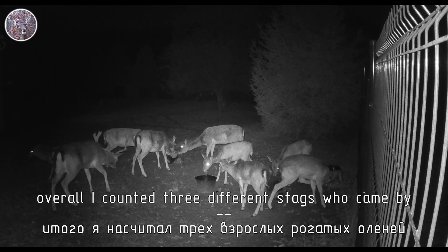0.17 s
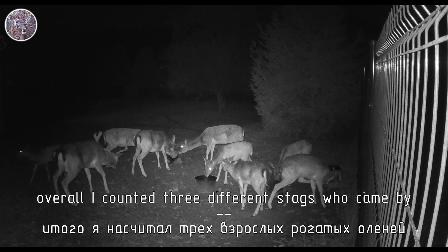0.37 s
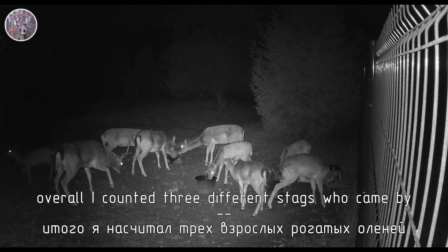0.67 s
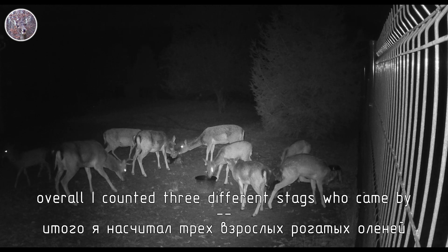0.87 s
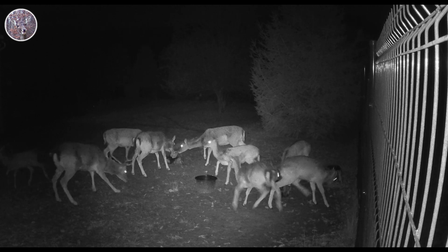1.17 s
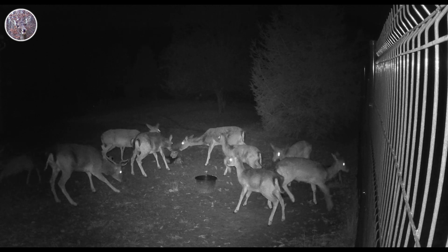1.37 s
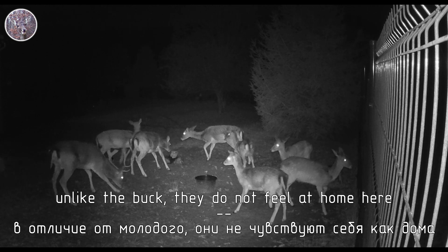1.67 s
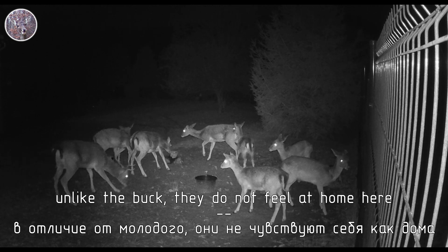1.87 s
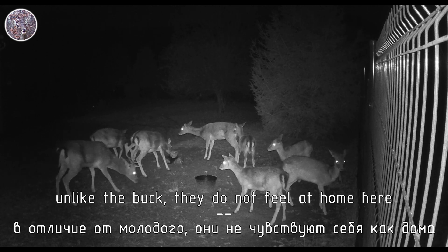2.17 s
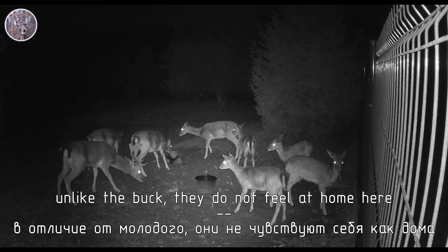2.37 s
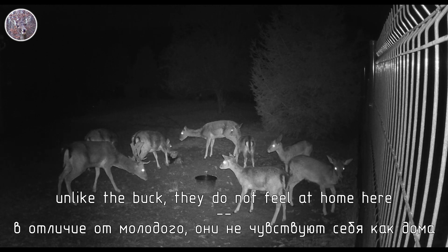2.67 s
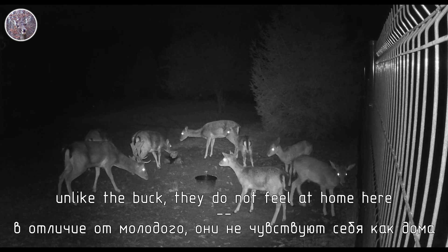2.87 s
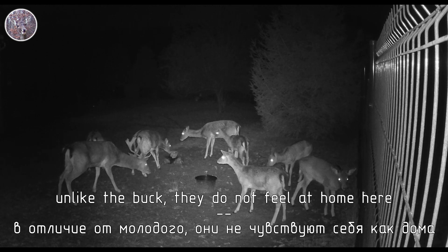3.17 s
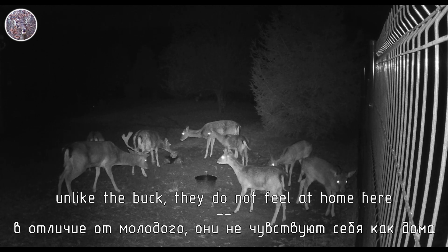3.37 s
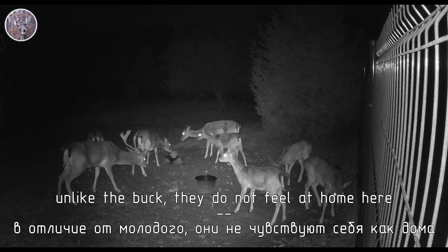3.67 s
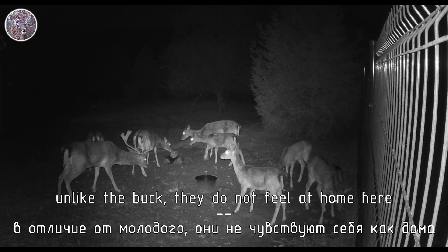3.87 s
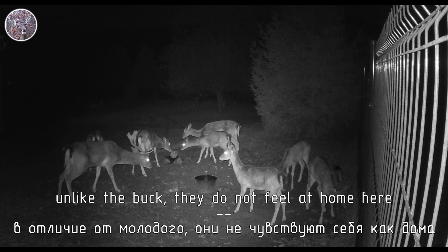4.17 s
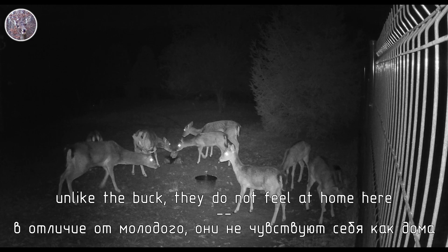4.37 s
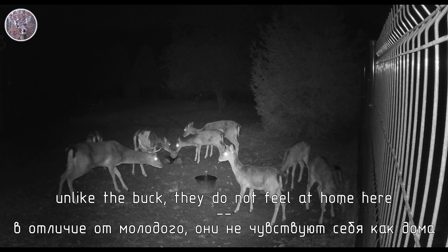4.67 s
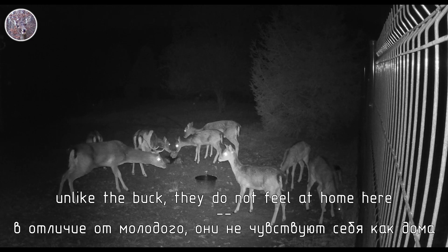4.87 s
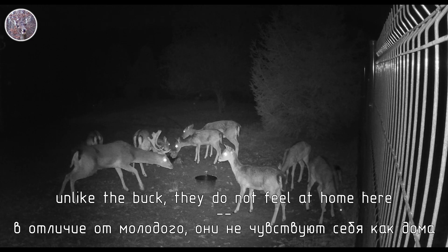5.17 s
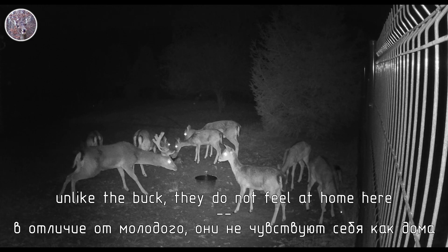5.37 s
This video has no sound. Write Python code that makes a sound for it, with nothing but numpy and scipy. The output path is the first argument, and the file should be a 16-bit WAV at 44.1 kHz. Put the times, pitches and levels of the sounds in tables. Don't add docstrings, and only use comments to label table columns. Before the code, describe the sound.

Five guttural deer grunts come roughly a second apart, each under half a second, starting tight and nasal, then sinking and fading. Trees, ground and a fence return a diffuse tail. Behind them are a distant stag's two weak calls, tiny piercing bird squeaks, mostly after the third grunt, and a barely audible twig snap at the end. Quiet night hush runs throughout, heard from a fixed outdoor microphone at moderate distance.

```python
import sys
import numpy as np
from scipy import signal
from scipy.io import wavfile
from scipy.ndimage import uniform_filter1d

SR = 44100
rng = np.random.default_rng(int(sys.argv[2]) if len(sys.argv) > 2 else 0)


def put_to_file(sound):
    columns = np.atleast_2d(sound).T
    safe = np.clip(columns, -1, 1)
    whole_steps = np.round(safe * 32767)
    wavfile.write(sys.argv[1], SR, whole_steps.astype(np.int16))


def gain_from_db(level_db):
    decades = np.asarray(level_db, float) / 20
    return 10 ** decades


N = 243873
LEAD = SR


def unit_rms(x):
    return x / np.sqrt(np.mean(x ** 2) + 1e-20)


def read_log(points, hz):
    f, value = np.transpose(points)
    return np.interp(np.log(hz + 1), np.log(f + 1), value)


def add(mix, start_s, sound):
    part = mix[LEAD + round(start_s * SR):][:len(sound)]
    part += sound[:len(part)]


def cut(x, hz, kind, order=4):
    return signal.sosfilt(signal.butter(order, hz, kind, fs=SR, output="sos"), x)


def rise(t, width_s):
    return .5 + .5 * np.tanh(.5 * t / width_s)


def ring(x, hz, width_hz, soft_hz=200):
    turn = np.exp(2j * np.pi * np.cumsum(hz * np.ones(len(x))) / SR)
    r, q = np.exp(-np.pi * np.array([width_hz, soft_hz]) / SR)
    resonant = signal.lfilter([1], [1, -r], x / turn + 1e-18)
    softened = signal.lfilter([1 - q], [1, -q], resonant)
    return 2 * np.sqrt(1 - r) * (turn * softened).imag


def hush():
    # (frequency [Hz], level [dB per Hz])
    hush_shape = [(20, -0.5), (60, -6), (120, -11.5), (165, -17), (230, -2.5), (400, -1.5), (620, 2),
                  (800, -13), (1020, -7), (1350, -15.5), (2500, -22), (8500, -34), (9600, -37.5),
                  (16000, -39)]
    level_db = -63.5
    frames, hz = N // 512 + 6, np.fft.rfftfreq(2048, 1 / SR)
    a, b, patches = rng.standard_normal((frames, 1025, 3)).T
    patches_db = 1.2 * unit_rms(uniform_filter1d(uniform_filter1d(patches, 10, 0), 6, 1))
    z = (a + 1j * b) * gain_from_db(read_log(hush_shape, hz)[:, None] + patches_db)
    return gain_from_db(level_db) * unit_rms(signal.istft(z, nperseg=2048, noverlap=1536)[1][:N])


def slope_return(calls):
    facing_db = [-24, -17, -22, -27, -28, -20]
    delay_s, low_hz, high_hz = .49, 970, 1110
    back = np.zeros(N + LEAD)
    for (start_s, sound), db in zip(calls, facing_db):
        add(back, start_s + delay_s, gain_from_db(db) * sound)
    return cut(cut(back, low_hz, "high"), high_hz, "low")


def wood_echo(x):
    # (frequency [Hz], t60 [s])
    decay = [(200, 0.39), (400, 0.56), (650, 0.71), (880, 0.93), (1030, 0.68), (1200, 0.56), (1800, 0.59),
             (3000, 0.57), (8000, 0.67)]
    build_s = .07
    out, turn = 0, np.pi * np.arange(len(x)) / SR * 7
    for k in range(3):
        taps = np.zeros(2 * SR)
        at = np.arange(600, 2 * SR - 20, 20)
        taps[at + rng.integers(0, 20, len(at))] = rng.choice([-1., 1.], len(at))
        hz, t, z = signal.stft(taps, SR, nperseg=512)
        envelope = gain_from_db(-60 * t / read_log(decay, hz)[:, None]) * (1 - np.exp(-t / build_s))
        tail = signal.istft(z * envelope, SR, nperseg=512)[1]
        tail = tail / np.linalg.norm(cut(tail, 1700, "low")) / 4
        share = np.sqrt(2 / 3) * np.cos(turn + k * np.pi / 3)
        out = out + signal.fftconvolve(x * share, tail)[:len(x)]
    return out


def note(start_s, length_s, from_hz, to_hz, db):
    ends_db = db - 2
    middle = (start_s + .5 * length_s, .5 * (from_hz + to_hz), db)
    return [(start_s, from_hz, ends_db), middle, (start_s + length_s, to_hz, ends_db)]


def whistle(rows):
    strain_db, strain_hz_per_db, calm_hz, drift_hz = -75, 11, 40, 40
    s, *columns = np.transpose(rows)
    t = np.arange(s[0], s[-1], 1 / SR)
    hz, db = (np.interp(t, s, c) for c in columns)
    warble_hz = calm_hz + strain_hz_per_db * np.maximum(db - strain_db, 0)
    wander, shiver, flicker = (unit_rms(cut(rng.standard_normal(len(t)), f, "low", order=2))
                               for f in (60, 220, 70))
    trill = 1.4 * np.sin(2 * np.pi * np.cumsum(410 + 25 * wander) / SR) + .5 * np.tanh(shiver)
    tone = np.sin(2 * np.pi * np.cumsum(hz + drift_hz * wander + warble_hz * trill) / SR)
    level = gain_from_db(db + 2 + (2 + warble_hz / 80) * flicker)
    return s[0], cut(tone, 8800, "low", order=14) * level * signal.windows.tukey(len(t), .1)


def birds():
    # (start [s], length [s], from [Hz], to [Hz], level [dB])
    slides = [(.07, .15, 8560, 8250, -91), (.26, .08, 9200, 8300, -89), (.34, .06, 8440, 9100, -87.5),
              (.4, .07, 8800, 8290, -87.5), (1.07, .1, 6160, 6750, -90.5), (1.1, .16, 5760, 5620, -87.5),
              (1.25, .21, 5840, 5620, -82.5), (1.28, .12, 6670, 6700, -89), (2.68, .05, 8230, 8900, -90),
              (2.73, .14, 8800, 8450, -91), (3.0, .11, 8200, 8140, -85), (3.73, .04, 7420, 7970, -76),
              (3.77, .035, 8260, 7350, -78.5), (3.96, .06, 6050, 5970, -77), (4.07, .04, 5850, 5620, -77),
              (4.13, .13, 6100, 5570, -75.5), (5.305, .09, 8120, 7930, -78.5), (5.4, .08, 7700, 8150, -84)]
    # (time [s], frequency [Hz], level [dB])
    phrases = [
        [(3.7, 5900, -91), (3.765, 6930, -79), (3.8, 6180, -81), (3.85, 5920, -89), (3.89, 6350, -82),
         (3.93, 7540, -71.5), (4, 7600, -60.5), (4.1, 7130, -66.5), (4.13, 5950, -80)],
        [(3.885, 7630, -79), (3.94, 7800, -56.5), (4.02, 8070, -57), (4.11, 8020, -63), (4.14, 7400, -65)],
    ]
    mix = np.zeros(N + LEAD)
    for rows in phrases + [note(*row) for row in slides]:
        add(mix, *whistle(rows))
    return mix


def far_call(start_s, length_s, db, from_hz, sunk_hz):
    peak, upper_hz = 0.18, 1045
    t = np.arange(0, length_s, 1 / SR)
    snaps = np.diff((t * 42).astype(int), prepend=0) + 0.055 * rng.standard_normal(len(t))
    lower_hz = np.interp(t / length_s, [0, peak], [from_hz, sunk_hz])
    voice = ring(snaps, lower_hz, 35) + gain_from_db(1.5) * ring(snaps, upper_hz, 65)
    voice = unit_rms(cut(cut(voice, 420, "high"), 830, "low"))
    swell_db = np.interp(t / length_s, [0, peak, 1], [-11, 0, -14.5])
    return start_s, voice * gain_from_db(db + swell_db) * signal.windows.tukey(len(t), .3)


def far_stag():
    # (start [s], length [s], level [dB], ring at the start [Hz], ring once sunk [Hz])
    far_calls = [
        (.26, 0.21, -55.5, 565, 540),
        (1.133, .2, -45, 606, 532.5),
    ]
    mix = np.zeros(N + LEAD)
    for row in far_calls:
        add(mix, *far_call(*row))
    return mix


def cavity(drive, count, modes, short, soft_hz, shape_db, luck_db=1.5):
    luck = luck_db * rng.standard_normal((len(modes), 64))[:, count % 64]
    out = 0
    for k, (hz, width_hz, db, share, gain_db) in enumerate(modes):
        level_db = db + shape_db[k] + gain_db * short / 0.079 + luck[k]
        out = out + (-1) ** k * ring(drive * gain_from_db(level_db), hz * (1 + share * short), width_hz, soft_hz)
    return out


def effort_curve(t, full_s, length_s, top_db, first_db, lull_db, fade_db):
    build = first_db * np.clip(1 - t / full_s, 0, 2) ** 1.416
    lull = lull_db * np.exp(-((t - full_s - .07) / .028) ** 2)
    fade = fade_db * np.clip((t - full_s) / (length_s - full_s), 0, 1) ** 2.52
    return top_db + build + lull + fade


def grunt(beat, effort, colour, lips, early):
    # (frequency with long throat [Hz], width [Hz], level [dB],
    # share of the stretch followed [0-1 or more], gain while the throat is short [dB])
    chest_rings = [(261.5, 29, -7, 0, -0.5), (406.7, 22, -5.5, 0.7, -1.5)]
    throat_rings = [(649.4, 40, 0.5, 1.36, 0.017), (474.6, 17, -16, 4.2, 0.0088),
                    (829, 87, -9.5, 3.8, 0.0041)]
    nasal_rings = [(1020, 24, 0, 1, 0), (1150, 55, -8, .3, -22), (1330, 50, -12, .5, -4)]
    palate_rings = [(1410, 11, -49.5, 1.4, 26)]
    mouth_rings = [(1783, 140, -3, 1, -2.5), (2325, 110, -10, 1.7, -17.5), (2847, 240, -12.5, 0.82, -1),
                   (3350, 190, -16, 0.18, -11), (3620, 54, -24, 0.49, -4.5), (4660, 350, -45.5, 0.7, -3.5)]
    # (time [s], level [dB])
    hard_snaps = [(.539, 7), (.562, 5), (.629, 6), (.742, 5), (1.471, 5), (1.494, 5), (1.649, 7),
                  (1.697, 7), (2.752, 3), (2.828, 7), (2.938, 5), (3.008, 8), (3.058, 5), (3.972, 5),
                  (3.997, 3), (4.108, 5), (4.132, 8), (4.181, 11), (4.907, 5), (5.047, 3), (5.069, 5),
                  (5.165, 3)]
    long_hz, short_hz, sunk_hz = 1020, 1158.8, 1006.3
    sink_after_s, sink_s, mouth_lag_s = 0.0063, 0.049, .07
    slack, tighten_s, sag_per_s2 = .8468, .0091, 24.2
    shut_db, open_db, jaw_s = -30.5, -22, 0.017
    sealed_db, part_s = -10, -.025
    tired_db, first_snap_db, breath, drain = -3.5, -6, .2, .85
    rasp_db, thump_db = -14, -25.5

    start_s, tight_s, pace_hz, length_s = beat
    top_db, first_db, lull_db, fade_db, full_after_s = effort
    nasal_db, nasal_early_db, chest_db, tilt_db, jaw_after_s = colour
    upper_early_db, mouth3_early_db, chest_early_db, tilt_early_db = early
    lips_db = [*lips, 0, 0]
    t = np.arange(-.02, length_s + .1, 1 / SR)
    after = t - tight_s
    effort_db = effort_curve(t, tight_s + full_after_s, length_s, top_db, first_db, lull_db, fade_db)

    shut_now_db = shut_db + upper_early_db
    mouth_db = shut_now_db + (open_db - shut_now_db) * rise(after - jaw_after_s, jaw_s)
    mouth_db += sealed_db * rise(part_s - after, tighten_s)

    rate_hz = pace_hz * (slack + (1 - slack) * rise(after, tighten_s)) - sag_per_s2 * np.maximum(after, 0)
    turns = np.cumsum(rate_hz) / SR
    turns += 1 - np.interp(0, t, turns)
    count = turns.astype(int)
    hard_db = sum(db * (count == np.round(np.interp(s, start_s + t, turns, -1, -1)))
                  for s, db in hard_snaps)
    snap_db = hard_db + tired_db * rise(after - sink_after_s, sink_s)
    snaps = np.diff(count, prepend=0) * np.sqrt(SR / rate_hz) * gain_from_db(snap_db)
    puffs = np.exp(-(turns % 1) / 1.1) * rng.standard_normal(len(t)) * 3.36
    gain = (t < length_s) * (count > 0) * gain_from_db(effort_db - 2.5 + first_snap_db * (count == 1))

    short, late = ((short_hz + (sunk_hz - short_hz) * rise(after - sink_after_s - lag_s, sink_s))
                   / long_hz - 1 for lag_s in (0, mouth_lag_s))
    airy = (.5 * snaps + puffs) * gain * gain_from_db(mouth_db)
    roughness = breath * np.clip(1.6 - short / 0.45, .4, 2)
    drive = (snaps + roughness * puffs) * gain
    lips_db[3] += mouth3_early_db * rise(jaw_after_s - .05 - after, jaw_s) * rise(after - .015, tighten_s)
    tilt_db += tilt_early_db * short / 0.092

    chest_drive = drive * gain_from_db(chest_db + chest_early_db * short / 0.11)
    nasal_drive = drive * gain_from_db(nasal_db + nasal_early_db * np.minimum(short / 0.11, 1))
    low = cavity(chest_drive, count, chest_rings, short, 120, [tilt_db, 0])
    low += cavity(drive, count, throat_rings, short, 330, [0, 0, 0])
    low += cavity(nasal_drive, count, nasal_rings, short, 310, [0, 0, 0])
    low *= 1 - drain * np.clip(.35 + short / .12, 0, 1) * (turns % 1) ** 4 * (t < length_s)
    low = cut(cut(low, 1320, "low", order=6), 185, "high", order=6)
    high = cavity(drive, count, palate_rings, short, 140, lips_db)
    high += cavity(airy, count, mouth_rings, late, 220, lips_db[1:], luck_db=2.5)
    rasp = gain_from_db(rasp_db) * cut(cut(airy, 1600, "high"), 3900, "low", order=6)
    rasp += gain_from_db(rasp_db - 27) * cut(puffs * gain * gain_from_db(mouth_db), 4000, "high")
    rasp = cut(rasp, 9000, "low", order=8)
    thump = ring(drive * gain_from_db(chest_db + .6 * tilt_db + thump_db), 115, 60, 90)
    return start_s + t[0], low + high + rasp + cut(thump, 53, "high", order=2)


def stag_calls():
    # (first snap [s], folds tighten after [s], tight snap rate [Hz], length [s])
    beats = [(.4357, .1263, 46.82, .385), (1.3698, .0979, 47.19, .395), (2.7268, .1002, 46.61, .385),
             (3.844, .1463, 46.21, .365), (4.7791, .1347, 46.09, .42)]
    # (effort [dB], first snap below it [dB], lull after first push [dB], fade to the end [dB],
    # full effort after tightening [s])
    efforts = [(-27, -28, -4, -7, 0.011), (-24, -33, -12.5, -10, .02), (-27.5, -30, 0.5, -7.5, 0.084),
               (-28.5, -40.5, 1, -9, 0.021), (-24.5, -32.5, -3.5, -12, 0.065)]
    # (nasal [dB], nasal gain while short [dB], chest [dB], lowest ring against the next [dB],
    # jaw drops after tightening [s])
    colours = [(-4.5, 3.5, -6.5, 5, 0.19), (-6, 12.5, -0.5, -22.5, 0.17), (-3.5, 9, -0.5, -3, 0.19),
               (-3, 11, -2, -1.4, 0.04), (-3, 15, -6, 4.5, .1)]
    # (palate [dB], mouth ring 1 [dB], ring 2 [dB], ring 3 [dB], ring 4 [dB])
    lip_shapes = [(-6, -1.5, -2, -9.5, -1), (0.5, 1, 2.5, -9.5, -3), (7.5, 6, -2, -3, -5.5),
                  (-13, -1.5, -0.5, -6, -1.5), (-8.5, 3.5, 6.5, 5, -7.5)]
    # (upper rings [dB], third mouth ring [dB], chest [dB],
    # lowest ring and push [dB])
    early_shapes = [(-0.5, -6.5, 11.5, -9), (0.5, 16.5, -6.5, 12), (2.5, -8, 9, -6.5), (12.5, 2.5, 7.5, -7),
                    (1, -14, -2.5, 3.5)]
    calls = [grunt(*call) for call in zip(beats, efforts, colours, lip_shapes, early_shapes)]
    calls.append((-.76, gain_from_db(3) * calls[-1][1]))
    return calls


def twig():
    # (time [s], level [dB], frequency [Hz])
    twig_snap = (5.5, -70, 8000)
    start_s, db, hz = twig_snap
    t = np.arange(300) / SR
    return start_s, gain_from_db(db - 60 * t / 0.018) * ring(rng.standard_normal(300), hz, 2300, 4000)


def scene():
    # (delay [s], gain [1])
    bounces = [
        (.0029, 0.074),
        (.0068, 0.05),
    ]
    stag = np.zeros(N + LEAD)
    calls = stag_calls()
    for (start_s, sound) in calls:
        add(stag, start_s, sound)
    far, small = far_stag(), birds()
    add(small, *twig())
    near = stag + sum(gain * np.roll(stag + small, round(delay_s * SR)) for delay_s, gain in bounces)
    echo = wood_echo(gain_from_db(-4) * stag + 0.21 * far + gain_from_db(-11.5) * small)
    outdoors = near + slope_return(calls) + 0.75 * far + small + echo
    return (outdoors[LEAD:] + hush())[None]


def roll_off(x):
    return signal.sosfilt(signal.butter(12, 15740, fs=SR, output="sos"), x)


def record(dry):
    return roll_off(dry + .001)


dry = scene()
out = record(dry)
put_to_file(out)
```